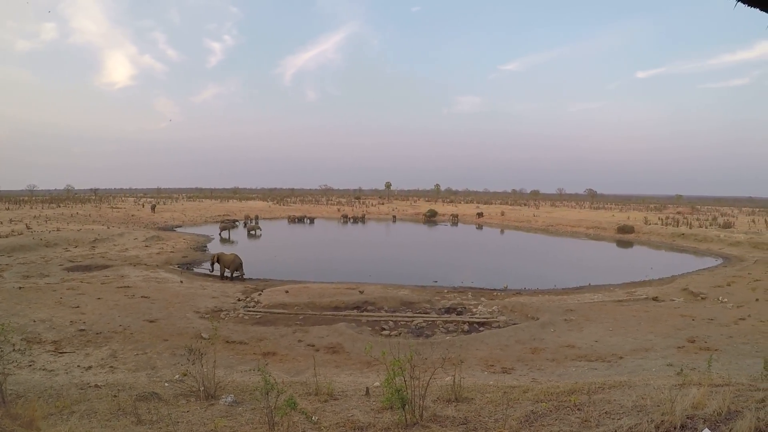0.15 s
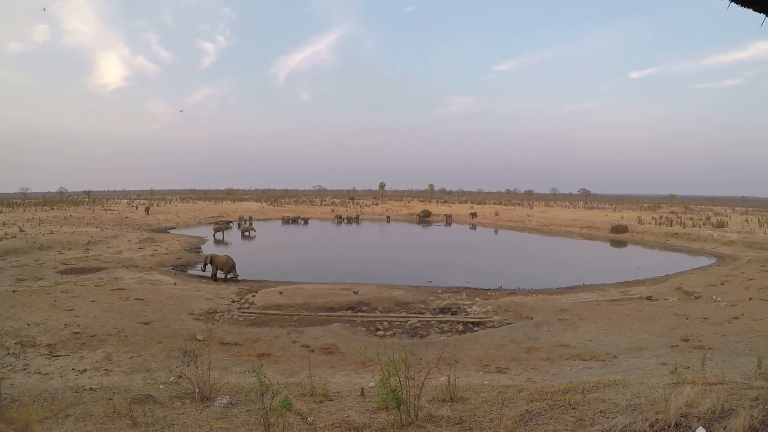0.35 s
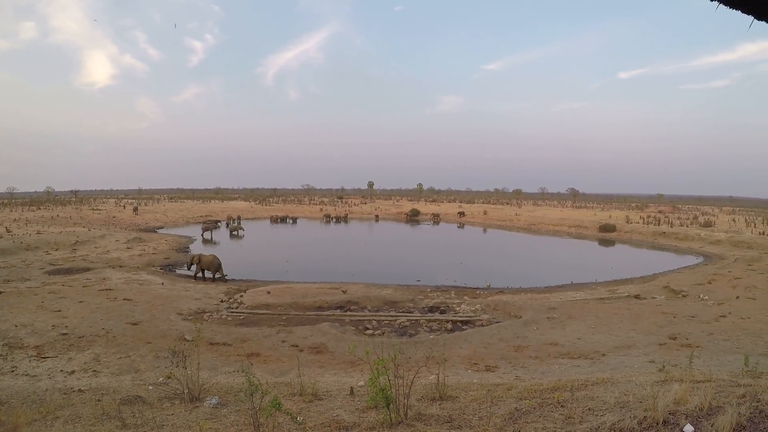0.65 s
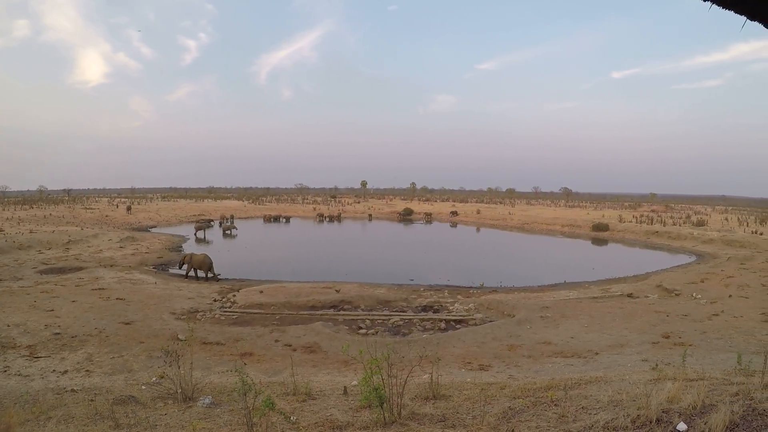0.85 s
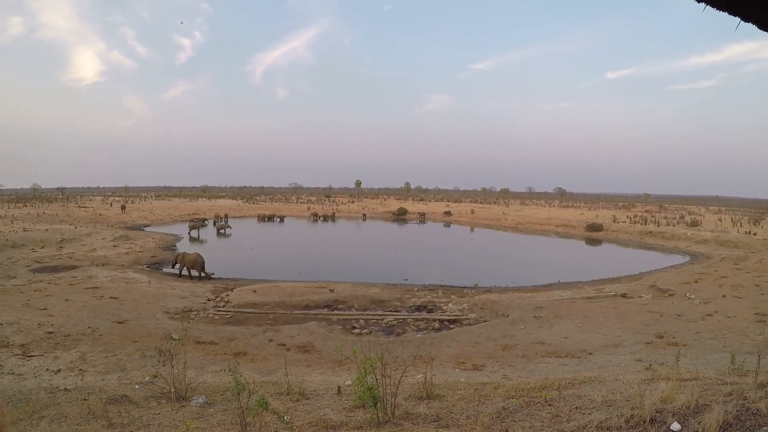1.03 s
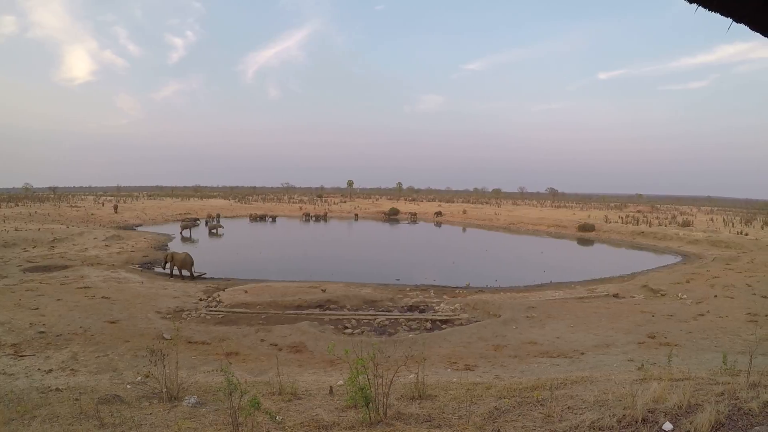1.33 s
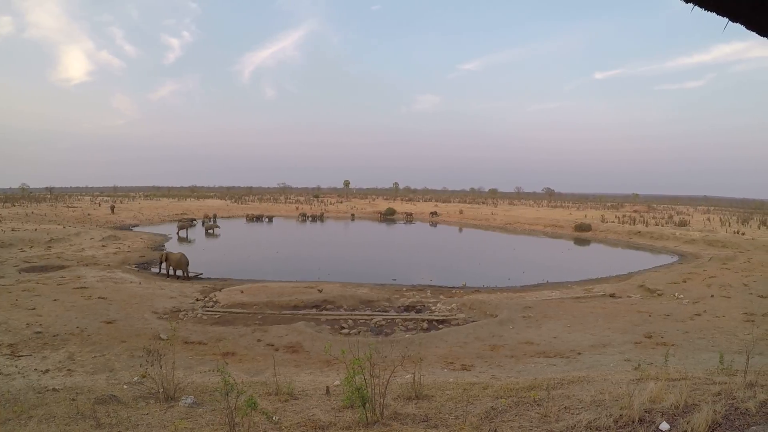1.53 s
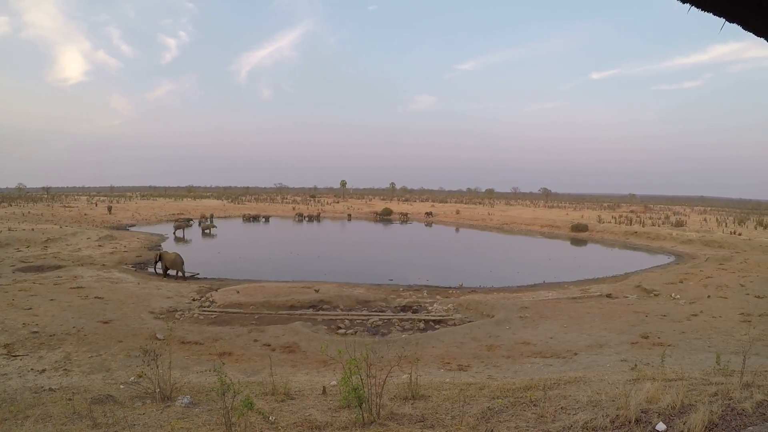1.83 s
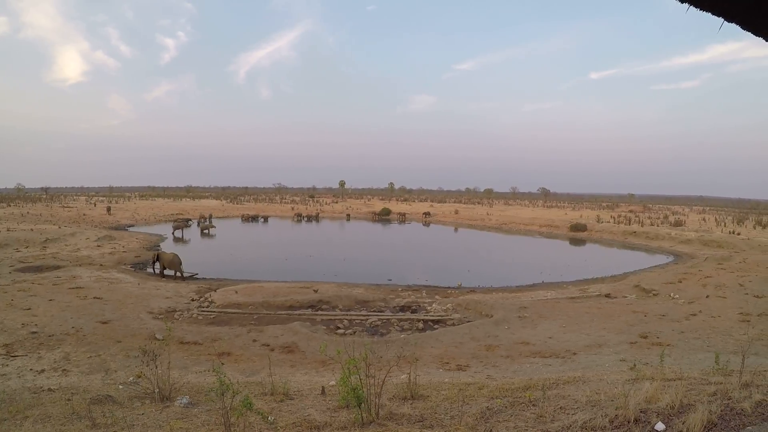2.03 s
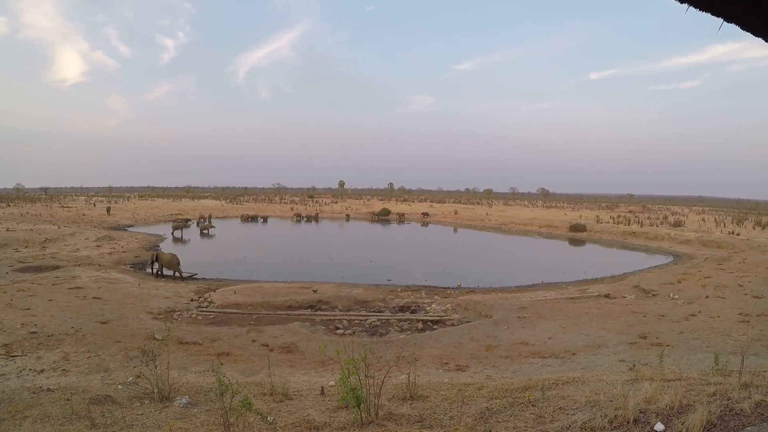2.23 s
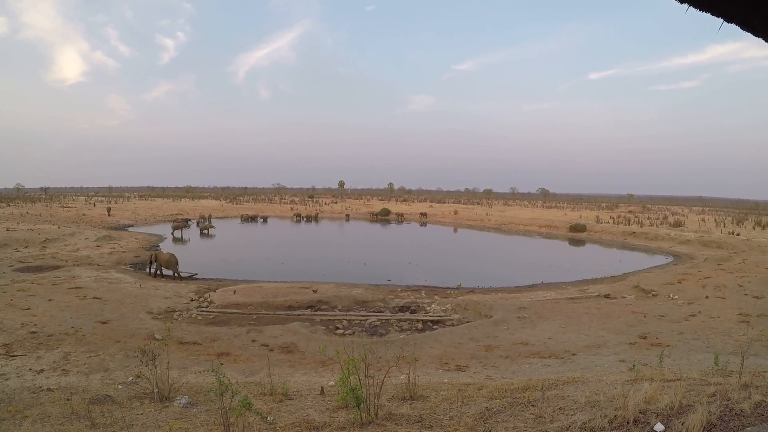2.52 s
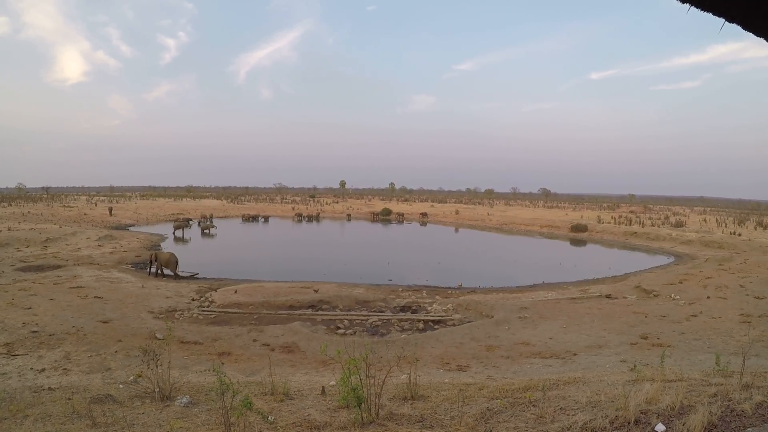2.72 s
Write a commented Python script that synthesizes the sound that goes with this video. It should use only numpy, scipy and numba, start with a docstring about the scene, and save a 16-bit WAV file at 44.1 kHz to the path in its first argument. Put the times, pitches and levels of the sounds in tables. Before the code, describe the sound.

A high, even cicada chorus carries across open grassland by a waterhole, dotted with small birds' chirps, rasps and falling whistles and a guineafowl's repeated nasal note. The microphone mount is bumped three times in the first half, rattling slightly.

```python
"""A far cicada chorus hisses over light air noise at an open savanna waterhole; a guineafowl repeats
a nasal call, small birds whistle, chirp and rasp, and three dull knocks come through the camera mount.
The call is a hoarse harmonic stack, whistles and chirps are gliding tones, rasps are filtered pulses.
Each knock booms the mount and rattles a small part. Dense clicks ring the cicadas' bodies."""
import sys
import numpy as np
from scipy import signal
from scipy.fft import rfft, irfft
from scipy.io import wavfile
from scipy.ndimage import uniform_filter1d
from numba import njit

SR = 44100
rng = np.random.default_rng(int(sys.argv[2]) if len(sys.argv) > 2 else 0)


def transcribe(signal):
    """Save signal, clipped to [-1, 1], as a 16-bit WAV file at the path in sys.argv[1]."""
    frames = np.atleast_2d(signal).T
    limited = np.clip(frames, -1, 1)
    pcm = np.round(limited * 32767).astype(np.int16)
    wavfile.write(sys.argv[1], SR, pcm)


N = 126567
T = np.arange(N) / SR


def undb(db):
    return 10 ** (np.asarray(db) / 20)


def level(x, db):
    return x * undb(db) / np.sqrt(np.mean(x ** 2))


def pan(x, db):
    """db = left minus right."""
    return x * undb(np.array([db / 2, -db / 2])).reshape(2, -1)


def walk(rate_hz):
    """Random steps, smoothed twice; spread near 1."""
    hold = int(SR / rate_hz)
    steps = np.repeat(rng.standard_normal(N // hold + 1), hold)
    return 1.3 * uniform_filter1d(uniform_filter1d(steps, hold), hold)[:N]


def gate(start_s, length_s, edge_s):
    inside_s = np.minimum(T - start_s, start_s + length_s - T)
    return np.sin(np.pi / 2 * np.clip(inside_s / edge_s, 0, 1)) ** 2


@njit
def bandpass(x, hz, width_hz):
    """State-variable filter, moving centre."""
    y, band, low = np.empty(len(x)), 0., 0.
    for i in range(len(x)):
        g, k = np.tan(np.pi * hz[i] / SR), width_hz / hz[i]
        v = (band + g * (x[i] - low)) / (1 + g * (g + k))
        band, low, y[i] = 2 * v - band, low + 2 * g * v, k * v
    return y


# calls: t/s, length/s, f/Hz, partial 3/dB, partial 4/dB, partials 5-8/dB, partials 9-13/dB
FOWL_CALLS = [(0.106, 0.099, 404.2, -61, -42, -53.5, -57), (0.524, 0.0935, 396.6, -59, -59, -56, -58.5),
              (0.923, 0.087, 390, -65, -54, -66, -61), (1.368, 0.063, 396.5, -61, -59, -54, -64),
              (1.831, 0.074, 394, -59.5, -59.5, -59, -65.5), (2.31, 0.065, 390, -61.5, -55, -66, -78),
              (2.793, 0.067, 388, -55.5, -49.5, -70, -68)]
# upper partials: harmonic number, gain/dB
FOWL_PARTIALS = [(5, -6.5), (6, -18), (7, -2), (8, -4), (9, -2.5), (10, 3.9), (11, -1.5), (12, 1),
                 (13, -19)]


def guineafowl(scoop=.02, scoop_s=.0163, sag_per_s=.85, waver_db=3):
    """Wavering harmonics scoop up, then sag; a noisy cluck opens each hoarse call."""
    out = 0
    waver = [undb(waver_db * walk(50.13)) for _ in range(11)]
    jitter = 1 + .005 * walk(80)
    breath = level(bandpass(rng.standard_normal(N), np.full(N, 3000.), 3000.), 0)
    for t, length, hz, third_db, fourth_db, middle_db, top_db in FOWL_CALLS:
        s = np.clip(T - t, 0, length) - scoop_s
        bend = 1 - np.where(s < 0, -scoop * s / scoop_s, sag_per_s * s)
        phase = 2 * np.pi * np.cumsum(hz * bend * jitter) / SR
        low = undb(third_db) * np.sqrt(waver[0]) * np.sin(3 * phase)
        low += undb(fourth_db) * np.sqrt(waver[1]) * np.sin(4 * phase)
        high = sum(undb(db + (middle_db if k < 9 else top_db)) * gain * np.sin(k * phase + k * k)
                   for (k, db), gain in zip(FOWL_PARTIALS, waver[2:]))
        upper_db = (middle_db + top_db) / 2
        hoarse = undb(upper_db - 3) * breath * (1 + np.cos(phase))
        cluck = undb(upper_db - 4) * breath * gate(t, .031, .0047)
        out += (pan(low, -5) + high + hoarse) * gate(t, length, .011) + cluck
    return out


# whistles: t/s, swell/s, fall/s, start f/Hz, bend f/Hz, end f/Hz, level/dB, fade/dB, pan/dB
WHISTLES = [(1.007, 0.045, 0.079, 2944, 2873, 2280, -50.5, -11.5, 1),
            (1.226, 0.035, 0.063, 3060, 2894, 2240, -49.5, -9, 2),
            (2.009, .03, .066, 3150, 3000, 2120, -45.5, -12.5, -1),
            (2.443, 0.041, 0.043, 3080, 2952, 3120, -52.5, -1, -1)]


def whistles(wobble, burr_hz=150.8, burr_depth=.47, swing_hz=133):
    """Tones swell, bend and fade; a burr in pitch and level grows until the bend."""
    out = 0
    burr = np.sin(2 * np.pi * np.cumsum(burr_hz * (1 + .11 * walk(30))) / SR)
    for t, swell, fall, start_hz, bend_hz, end_hz, db, fade_db, pan_db in WHISTLES:
        knots_s = [t, t + swell, t + swell + fall]
        rough = burr * np.clip((T - t) / swell, 0, 1) ** 2
        hz = np.interp(T, knots_s, [start_hz, bend_hz, end_hz]) * wobble + swing_hz * rough
        tone = np.sqrt(2) * np.sin(2 * np.pi * np.cumsum(hz) / SR)
        tone *= undb(db + np.interp(T, knots_s, [-4.5, 0, fade_db]))
        out += pan(tone * (1 + burr_depth * rough) * gate(t, swell + fall, .006), pan_db)
    return out


# chirps: t/s, length/s, start f/Hz, end f/Hz, level/dB, pan/dB
CHIRPS = [(0.385, 0.13, 1990, 2070, -63.5, 1), (0.4, 0.01, 3340, 3100, -58.5, 0),
          (0.454, 0.013, 4300, 4210, -55.5, 2), (0.462, 0.0097, 3570, 3450, -62, 0),
          (0.54, 0.013, 5200, 4600, -51, 3), (0.631, 0.037, 1780, 1960, -60.5, 7),
          (0.645, .016, 3850, 3950, -62, 2), (0.832, 0.024, 3580, 3595, -52.5, 1),
          (0.968, 0.045, 1750, 1890, -58, 2), (1.117, .014, 4450, 4080, -60, 6),
          (1.128, .012, 3680, 3640, -57, 6), (1.18, 0.026, 5250, 4350, -57, 4),
          (1.214, .012, 4960, 4860, -54, 6), (1.222, 0.008, 4290, 4030, -49, 7),
          (1.354, 0.15, 1976, 2080, -63.5, 4), (1.418, 0.015, 4700, 5300, -58, 7),
          (1.434, 0.013, 5140, 3150, -49.5, 4), (1.451, 0.0074, 3010, 2900, -53, 6),
          (1.465, 0.018, 2866, 2960, -52, 2), (1.484, 0.0066, 2700, 2580, -58, 4),
          (1.651, 0.011, 1800, 1760, -54.5, 6), (1.811, 0.0185, 3850, 5270, -61, 3),
          (1.948, 0.033, 4660, 4360, -56, 15), (2.117, 0.014, 4250, 4390, -48.5, 4),
          (2.178, 0.017, 5220, 4870, -59, 3), (2.192, 0.017, 4180, 3950, -50, 4),
          (2.206, 0.009, 3460, 3250, -51, 3), (2.372, 0.018, 4300, 4320, -55.5, 3),
          (2.383, 0.05, 2020, 2050, -62.5, 1), (2.716, .014, 3760, 3670, -57, 0),
          (2.783, 0.015, 4270, 3850, -50, 4), (2.81, 0.013, 3890, 3730, -60, 0)]


def chirps(wobble, waver_db=1.9):
    """Short, clean sine glides."""
    out = 0
    waver = undb(waver_db * walk(150))
    for t, length, start_hz, end_hz, db, pan_db in CHIRPS:
        hz = np.interp(T, [t, t + length], [start_hz, end_hz]) * wobble
        tone = np.sqrt(2) * undb(db) * np.sin(2 * np.pi * np.cumsum(hz) / SR)
        out += pan(tone * waver * gate(t, length, min(.12 * length, .012)), pan_db)
    return out


# rasps: t/s, length/s, start f/Hz, end f/Hz, width/Hz, level/dB, pulse rate/Hz
RASPS = [(0.509, 0.034, 4700, 4570, 1600, -55, 400), (0.52, .007, 5060, 4770, 1300, -46.5, 400),
         (0.513, 0.053, 2000, 1800, 1510, -54, 490), (0.672, 0.13, 3300, 3530, 1590, -49.5, 320),
         (0.684, 0.08, 2800, 2750, 450, -58.5, 320), (0.781, 0.087, 3570, 3820, 2000, -53.5, 260),
         (0.915, 0.019, 1910, 1800, 900, -54, 350), (1.39, 0.062, 1800, 1700, 700, -61.5, 270),
         (1.153, 0.043, 4360, 4460, 1900, -52, 300), (1.246, 0.037, 4160, 4100, 600, -55.5, 320),
         (1.48, 0.022, 3800, 3800, 1200, -55, 320), (1.576, 0.16, 3180, 3700, 1500, -53.5, 250),
         (1.615, 0.082, 2980, 3200, 600, -53, 237), (1.699, 0.031, 4200, 4940, 1400, -44.5, 266),
         (1.689, 0.049, 2190, 2200, 1500, -54, 320), (1.953, 0.043, 4700, 4150, 900, -54.5, 240),
         (2.12, 0.033, 4360, 4400, 2000, -51.5, 120), (2.172, 0.025, 5100, 4900, 800, -53, 220),
         (2.2, 0.019, 4150, 3970, 2000, -52, 200), (2.719, .02, 3700, 3620, 1500, -58, 250),
         (2.769, 0.035, 4800, 4200, 1300, -56.5, 300), (2.173, .04, 1870, 1980, 700, -56.5, 320),
         (2.543, 0.043, 5000, 4750, 900, -46, 300), (2.544, 0.029, 3450, 3700, 900, -45.5, 300),
         (2.552, 0.038, 2060, 2050, 1200, -52.5, 300), (2.57, 0.058, 4240, 4300, 1800, -55, 380)]


def rasps(breath_db=-6, pan_db=2.5):
    """Uneven pulses and breath drive a gliding resonance."""
    out = np.zeros((2, N))
    jitter = 1 + .3 * walk(300)
    strength = undb(2.2 * walk(150))
    breath = undb(breath_db) * rng.standard_normal(N)
    for t, length, start_hz, end_hz, width_hz, db, rate_hz in RASPS:
        span = slice(int(t * SR), int((t + length) * SR))
        cycles = np.cumsum(rate_hz * jitter / SR)
        pulses = np.diff(np.floor(cycles), prepend=0) * strength
        drive = level(pulses[span] + 1e-9, 0) + breath[span]
        hz = np.interp(T[span], [t, t + length], [start_hz, end_hz])
        rasp = level(bandpass(bandpass(drive, hz, width_hz), hz, width_hz), db)
        out[:, span] += pan(rasp * gate(t, length, .17 * length)[span], pan_db)
    return out


# small part's modes: f/Hz, gain/dB, t60/s
RATTLE_MODES = [(963, -0.5, 0.041), (626, -2, 0.017), (1340, 0, 0.016), (2100, 2, 0.012), (403, -15, 0.02)]


def rattle(t, rise_s, right_gain, t60_scale=1):
    """A small part rings in damped modes, heard at both microphone ports."""
    s = np.clip(T - t, 0, .2)
    ring = sum(undb(db) * np.sin(2 * np.pi * hz * s) * undb(-60 * s / (t60 * t60_scale))
               for hz, db, t60 in RATTLE_MODES)
    return np.array([[1], [right_gain]]) * ring * np.minimum(s / rise_s, 1)


# knocks, before the wind filter: t/s, level/dB, f/Hz, decay/s, rattle/dB
KNOCKS = [(0.355, -23.5, 170.7, 0.046, -36), (.584, -17.5, 166.3, 0.042, -26.5),
          (1.112, -21.5, 169, 0.038, -52)]


def knocks(rise_s=.0137, wind_filter_hz=114):
    """The mount booms, louder and earlier on the left; the small part ticks once and rattles."""
    out = undb(-29) * rattle(.355, rise_s=.0018, right_gain=-.41, t60_scale=.52)  # tick
    for t, db, hz, decay_s, rattle_db in KNOCKS:
        for ch, (gain_db, lag_s, decay_scale) in enumerate([(0, 0, 1), (-4, .00031, .85)]):
            s = np.maximum(T - t - lag_s, 0)
            decay = np.clip(1 - (s - rise_s) / (decay_s * decay_scale), 0, 1)
            envelope = np.minimum((s / rise_s) ** 3.95, decay)
            out[ch] += undb(db + gain_db) * envelope * np.sin(2 * np.pi * hz * s)
        out += undb(rattle_db) * rattle(t + .016, rise_s=.0045, right_gain=-.45)
    wind_filter = signal.butter(4, wind_filter_hz, "high", fs=SR, output="sos")
    return signal.sosfilt(wind_filter, out) + undb(-8) * out


# body resonances: f/Hz, width/Hz, gain/dB
CICADA_MODES = [(7090, 930, 4), (7429, 475, 8), (7747, 820, 5.5), (8350, 450, 1)]


def cicadas(level_db=-41.5, clicks_per_s=9000, swell_db=1.2):
    """Random clicks ring the far insects' bodies; one channel."""
    out = 0
    clicks = rng.standard_normal(N) * (rng.random(N) < clicks_per_s / SR)
    for hz, width_hz, db in CICADA_MODES:
        centre_hz = np.full(N, float(hz))
        ring = bandpass(bandpass(clicks, centre_hz, width_hz), centre_hz, 1.4 * width_hz)
        out += undb(db + swell_db * walk(15)) * ring
    return level(out, level_db)


# air spectra, mid and side: f/Hz, relative density/dB
AIR_MID = [(30, -18.5), (92, -37), (125, -10), (167, 2.5), (300, -5.5), (567, -12), (1440, -15),
           (2560, -16), (4420, -16), (5500, -21), (9900, -16), (11300, -67), (12200, -35), (15000, -37)]
AIR_SIDE = [(30, -36), (81, -33), (163, 3), (400, -3), (905, -3.5), (1500, -10), (2630, -16), (3800, -35),
            (5700, -37), (9900, -13), (11300, -58), (12200, -35), (15000, -37)]


def air(table, level_db, gust_db):
    """Coloured noise; half-octave bands flicker singly, and those under 2 kHz also swell together."""
    out = 0
    hz, db = np.array(table).T
    octave = np.log2(np.maximum(np.arange(N // 2 + 1) * SR / N, 10))
    spectrum = rfft(rng.standard_normal(N)) * undb(np.interp(octave, np.log2(hz), db))
    for centre in np.arange(4, 14.5, .5):
        band = irfft(spectrum * np.cos(np.pi * np.clip(octave - centre, -.5, .5)), N)
        flicker_db = (3 if centre < 8 else 1.42) * walk(14)
        out += band * undb(flicker_db + gust_db * (centre < 11))
    return level(out, level_db)


def echo(x, t60_s=.11, gain_db=-.5):
    """Short diffuse tail of decaying noise."""
    s = T[:SR // 4]
    tail = rng.standard_normal((2, len(s))) * undb(-60 * s / t60_s)
    tail *= undb(gain_db) / np.sqrt(np.sum(tail ** 2, axis=1, keepdims=True))
    return signal.fftconvolve(x, tail, axes=1)[:, :N]


def scene(bird_top_hz=5980):
    birds = guineafowl()
    wobble = 1 + .01363 * walk(200)  # pitch factor
    birds += whistles(wobble) + chirps(wobble) + rasps()
    birds = signal.sosfilt(signal.butter(6, bird_top_hz, fs=SR, output="sos"), birds)
    birds += echo(birds)
    gust_db = .92 * walk(6.86)
    mid, side = air(AIR_MID, -51, gust_db), air(AIR_SIDE, -49, gust_db)
    chorus = np.array([cicadas(), cicadas()])
    return birds + knocks() + chorus + np.array([mid + side, mid - side])


def record(dry, top_hz=15100):
    """The camera cuts the top treble."""
    return signal.sosfilt(signal.ellip(16, .3, 80, top_hz, fs=SR, output="sos"), dry)


dry = scene()
out = record(dry)
transcribe(out)
```